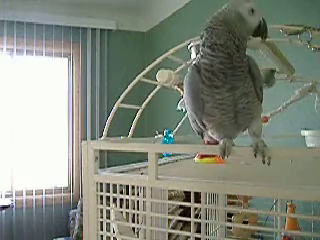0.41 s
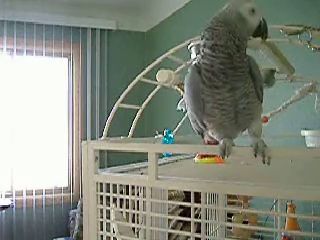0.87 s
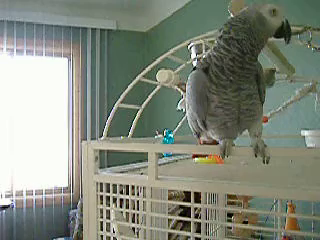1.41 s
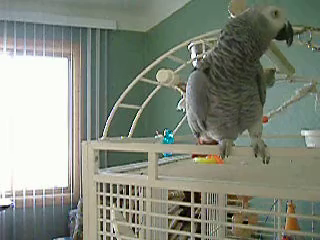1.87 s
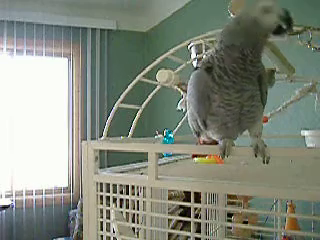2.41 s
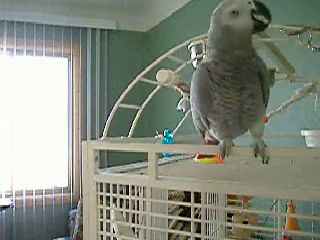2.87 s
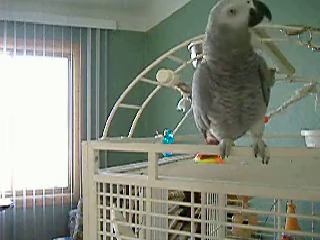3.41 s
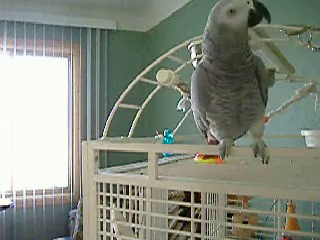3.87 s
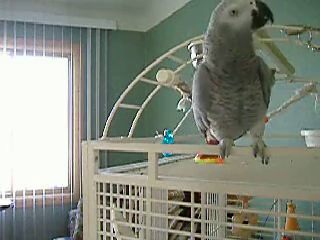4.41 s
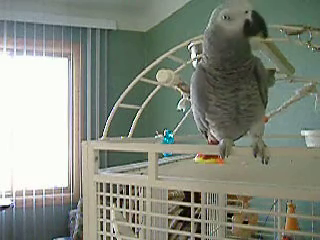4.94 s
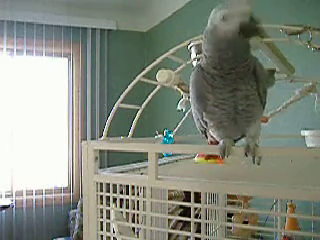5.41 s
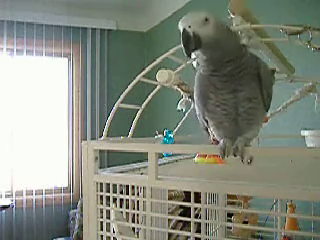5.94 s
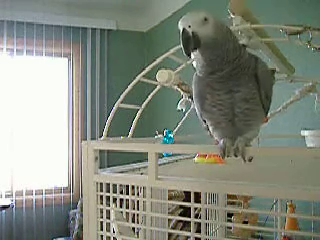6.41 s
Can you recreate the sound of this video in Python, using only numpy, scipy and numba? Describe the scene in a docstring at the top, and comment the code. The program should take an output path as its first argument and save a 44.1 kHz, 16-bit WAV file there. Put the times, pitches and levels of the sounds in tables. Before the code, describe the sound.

A small, reflective room holds a low wavering hum, dull air noise and a very thin high whine, heard through a cheap camera microphone. Soft cage knocks tick at 0.4, 0.9 and 1.5 seconds and occasionally later. Distant whistles glide upward at 1.25 and 1.85, with short peeps near 2.3 and 2.46. At 2.65 the near parrot jumps up in broken steps into a loud, nearly pure whistle, peaking around 2.9 and swooping down by 3.15, edged with crackle. A faint far warble flutters from 3.06 to 3.3; quick rising chirps come at 3.4 and 3.7, and a high falling glide at 3.9. Another fall at 4.27 overlaps a hoarse squawk from 4.28 to 4.65, leaping in pitch then sinking into breathy rasp. Echoing rapid down-chirps run from 4.6 to 5.55, then slower up-sweeps from 5.6 to 6.5, with tiny blips near 6.4.

```python
"""A parrot on its cage whistles one loud arc and a hoarse squawk: gliding near sines, then pulses ringing throat and beak.
Glides and trills, swept tones, come from further off in the room, mostly as reflections.
Soft knocks ring the cage bars and short blips sound over filtered-noise room tone and hum.
A cheap camera hears it all: gain control, a lopsided preamp, electronic whine,
and a 16 kHz converter that now and then misreads a sample."""
import sys
import numpy as np
from scipy import signal
from scipy.fft import rfft, irfft
from scipy.io import wavfile
from scipy.ndimage import uniform_filter1d
from numba import njit

SR = 44100
rng = np.random.default_rng(int(sys.argv[2]) if len(sys.argv) > 2 else 0)


def voltage_ratio(decibels):
    """Convert decibels (scalar or array-like) to amplitude ratios, 20 dB per decade."""
    exponent = np.asarray(decibels, float) / 20
    return 10 ** exponent


def digitize_waveform(pressure):
    """Quantize a signal to 16-bit integers and store it at the path in sys.argv[1].

    Rows of a 2-D input are taken as channels; values are limited to [-1, 1].
    """
    field = np.atleast_2d(pressure).T
    bounded = np.clip(field, -1, 1)
    quanta = np.round(bounded * 32767).astype(np.int16)
    wavfile.write(sys.argv[1], SR, quanta)


N = 288855
TIME = np.arange(N) / SR


def level(x, db):
    """Scale to an rms level."""
    return x * voltage_ratio(db) / np.sqrt(np.mean(x ** 2))


@njit
def bandpass(x, hz, width):
    """State-variable band-pass whose centre moves, gain 1 at the centre."""
    y, band, low = np.empty(len(x)), 0., 0.
    for i in range(len(x)):
        g, k = np.tan(np.pi * hz[i] / SR), width / hz[i]
        v = (band + g * (x[i] - low)) / (1 + g * (g + k))
        band, low, y[i] = 2 * v - band, low + 2 * g * v, k * v
    return y


@njit
def follow(x, attack, release):
    """Peak follower: closes a fixed share of the gap at each sample, rising or falling."""
    y, envelope = np.empty(len(x)), 1e-4
    for i in range(len(x)):
        gap = abs(x[i]) - envelope
        envelope += gap * (attack if gap > 0 else release)
        y[i] = envelope
    return y


def walk(rate):
    """Random levels held 1 / rate s and slewed twice."""
    hold = int(SR / rate)
    steps = np.repeat(rng.standard_normal(N // hold + 1), hold)
    return 1.2 * uniform_filter1d(uniform_filter1d(steps, hold), hold)[:N]


def gate(start, end, edge):
    """Soft on and off, with linear edges."""
    return np.clip(np.minimum(TIME - start, end - TIME) / edge, 0, 1)


# spectrum shape of the air and machine noise: (frequency [Hz], relative density [dB per Hz])
ROOM_SHAPE = [(12, -38.5), (20, -8), (59, -8.5), (138, -5.5), (168, -10), (206, -2), (366, -16.5),
              (520, -11.5), (1320, -30.5), (2460, -35), (3160, -33), (3680, -35), (6550, -35), (7420, -30),
              (8000, -30), (10400, -71), (17600, -120)]
ROOM_DB = -38  # rms of the whole noise
# wavering hums: (centre [Hz], filter width [Hz], rms level [dB])
HUMS = [(56.26, 7.1, -44), (199.4, 6.7, -45.5), (519.6, 14, -62)]


def room_tone():
    """Steady air and machine noise, with narrow bands of noise as wavering hums."""
    f = np.fft.rfftfreq(N, 1 / SR) + 1
    hz, db = np.transpose(ROOM_SHAPE)
    shape = voltage_ratio(np.interp(np.log(f), np.log(hz), db))
    out = level(irfft(rfft(rng.standard_normal(N)) * shape, N), ROOM_DB)
    for hz, width, db in HUMS:
        out += level(bandpass(rng.standard_normal(N), hz * np.ones(N), float(width)), db)
    return out


# short blips: (time [s], length [s], frequency [Hz], peak level [dB])
BLIPS = [(2.45, .004, 3392, -25), (2.662, 0.046, 516, -34), (2.667, 0.017, 7430, -25),
         (6.392, 0.015, 1487, -42), (6.437, 0.0085, 1473, -39.5)]


def blips():
    """Brief soft sine tones that swell and fade in a triangle."""
    out = np.zeros(N)
    for start, length, hz, db in BLIPS:
        out += voltage_ratio(db) * gate(start, start + length, length / 2) * np.sin(2 * np.pi * hz * TIME)
    return out


# soft knocks on the cage: (time [s], blow level [dB])
KNOCKS = [(.42, -42), (.885, -45.5), (1.5, -42.5), (2.45, -51), (2.505, -40.5), (2.565, -44.5),
          (3.63, -43.5), (4.1, -44), (4.235, -43), (5.77, -44)]
# modes of the cage bars: (frequency [Hz], relative level [dB], 60 dB decay time [s])
CAGE_BARS = [(1800, -3, .008), (2250, 0, .008), (3000, -6, .006), (3700, -2, .008)]


def cage_knocks():
    """Decaying noise bursts strike the cage bars, whose damped modes ring."""
    blows, size = np.zeros(N), 900
    for s, db in KNOCKS:
        start = int(s * SR)
        blows[start:start + size] += voltage_ratio(db) * rng.standard_normal(size) * np.exp(-np.arange(size) / 400)
    t = TIME[:SR // 8]
    ring = sum(voltage_ratio(db) * np.sin(2 * np.pi * hz * t) * np.exp(-np.log(1000) * t / t60)
               for hz, db, t60 in CAGE_BARS)
    ring /= np.sqrt(np.sum(ring ** 2))
    return signal.fftconvolve(blows, ring)[:N] + 0.23 * blows


def whistles(notes, edge, flutter_db, overtones_db, top_hz, waver):
    """The syrinx sings near sines; the beak lets overtones out only below top_hz."""
    out, shake = np.zeros(N), 1 + waver * walk(200)
    for note in notes:
        s, hz, db = np.transpose(note)
        on = slice(int(s[0] * SR), int(s[-1] * SR))
        hz, db = (uniform_filter1d(np.interp(TIME[on], s, curve), size=300) for curve in (hz, db))
        phase = 2 * np.pi * np.cumsum(hz * shake[on]) / SR
        tone = np.sin(phase)
        for multiple, over_db in overtones_db:
            tone += voltage_ratio(over_db) * np.sin(multiple * phase) / (1 + (multiple * hz / top_hz) ** 40)
        out[on] += np.sqrt(2) * voltage_ratio(db) * tone * gate(s[0], s[-1], edge)[on]
    return out * voltage_ratio(flutter_db * walk(150))


def sweeps(rows, rule):
    """Turn sweep rows into (s, Hz, dB) curves by their shared rule.

    Delay over 1 lingers on the first pitch, slowing over 1 eases into the last;
    a turning place past 1 leaves the swell still rising near the end.
    """
    delay, slowing, place, start_db, end_db = rule
    u = np.linspace(0, 1, num=24)
    way = 1 - (1 - u ** delay) ** slowing
    swell_db = np.interp(u, [0, place, 1], [start_db, 0, end_db])
    return [np.transpose([s + length * u, first_hz + (last_hz - first_hz) * way, db + swell_db])
            for s, length, first_hz, last_hz, db in rows]


def trill(notes, rule, flutter_db, waver):
    """Fast, unsteady sweeps (s, first Hz, last Hz, accent Hz, dB), slowing to their end, swelling at the accent."""
    length, slowing, width_hz, rest_db = rule
    u = np.linspace(0, 1, int(length * SR))
    fade = np.clip(np.minimum(u / 0.04, (1 - u) / 0.12), 0, 1)
    out, shake = np.zeros(N), 1 + waver * walk(250)
    for s, first_hz, last_hz, accent_hz, db in notes:
        on = slice(int(s * SR), int(s * SR) + len(u))
        hz = last_hz + (first_hz - last_hz) * (1 - u) ** slowing
        swell = voltage_ratio(rest_db) + np.exp(-((hz - accent_hz) / width_hz) ** 2)
        phase = 2 * np.pi * np.cumsum(hz * shake[on]) / SR
        out[on] += np.sqrt(2) * voltage_ratio(db) * swell * fade * np.sin(phase)
    return out * voltage_ratio(flutter_db * walk(140))


# far glides: (time [s], length [s], first pitch [Hz], last pitch [Hz], reference level before the mix [dB])
# and their rules: (delay [exponent], slowing [exponent], turning place of the swell [share of length],
# start level [dB re reference], end level [dB re reference])
SLOW_RISES = [(1.245, .35, 1572, 3218, -42.5), (1.843, .37, 1527, 3210, -40)]
SLOW_RISE_RULE = (1.12, 3.5, 0.43, -3.5, -15)
PEEPS = [(2.293, 0.13, 3364, 3600, -38.5), (2.46, .13, 3250, 3540, -42)]
PEEP_RULE = (0.75, 1.5, 0.2, 3.5, -20)
QUICK_RISES = [(3.41, .17, 3320, 4350, -25), (3.675, .18, 3110, 4220, -25.5)]
QUICK_RISE_RULE = (1.05, 2.6, .6, -22, -24)
FALLS = [(3.93, 0.28, 6720, 4154, -34.5), (4.268, .27, 6760, 4157, -33.5)]
FALL_RULE = (3, 11., 0.8, -7, -12.5)


def far_glides():
    """Gliding whistles with strong overtones."""
    glides = sweeps(SLOW_RISES, SLOW_RISE_RULE) + sweeps(PEEPS, PEEP_RULE)
    glides += sweeps(QUICK_RISES, QUICK_RISE_RULE) + sweeps(FALLS, FALL_RULE)
    return whistles(glides, 0.005, 4.1, [(2, 1.0), (3, 3.5), (4, -2.5)], 6150.0, waver=0.011)


# the warble: (time [s], first pitch [Hz], accent level before the mix [dB])
WARBLE = [(3.058, 3730, -37), (3.115, 4240, -36), (3.165, 4170, -31), (3.215, 4120, -31.5),
          (3.264, 4143, -31)]
# trill rule: (length [s], slowing [exponent], accent width [Hz], level away from the accent [dB])
WARBLE_RULE = (.05, 3.4, 220, -5)


def warble():
    """Short notes that all sweep up to one top pitch."""
    top_hz, accent_hz = 4980, 4420
    notes = [(s, hz, top_hz, accent_hz, db) for s, hz, db in WARBLE]
    return trill(notes, WARBLE_RULE, 3.0, waver=0.01)


# the falling trill: (time [s], last pitch [Hz], accent level before the mix [dB])
DOWN = [(4.6, 4575, -25), (4.692, 4500, -26), (4.799, 4064, -24), (4.895, 4145, -23.5),
        (4.987, 4100, -22.5), (5.083, 3976, -26), (5.166, 4126, -24.5), (5.256, 4194, -24.5),
        (5.335, 4080, -23.5), (5.424, 4160, -25.5), (5.508, 4177, -25)]
# its pitches at the first note: (top [Hz], accent [Hz])
DOWN_HZ = (6670, 5450)
# trill rule: (length [s], slowing [exponent], accent width [Hz], level away from the accent [dB])
DOWN_RULE = (.047, 1.2, 480, -13)


def falling_trill():
    """Downward sweeps whose top and accent sink from note to note."""
    top_sink, accent_sink = 350, 780  # Hz per s
    notes = []
    for s, last_hz, db in DOWN:
        since = s - DOWN[0][0]
        notes.append((s, DOWN_HZ[0] - top_sink * since, last_hz, DOWN_HZ[1] - accent_sink * since, db))
    return trill(notes, DOWN_RULE, 2.15, waver=0.015)


# the rising trill: (time [s], first pitch [Hz], last pitch [Hz], accent level before the mix [dB])
UP = [(5.606, 3537, 5310, -33.5), (5.735, 3435, 5390, -31), (5.867, 3367, 5500, -31.5),
      (5.994, 3420, 5595, -27.5), (6.127, 3370, 5550, -27.5), (6.258, 3244, 5630, -27),
      (6.401, 3043, 5305, -29)]
# trill rule: (length [s], slowing [exponent], accent width [Hz], level away from the accent [dB])
UP_RULE = (.1, 1.66, 451, -7)


def rising_trill():
    """Upward sweeps that swell around one accent pitch."""
    accent_hz = 4456
    notes = [(s, first_hz, last_hz, accent_hz, db) for s, first_hz, last_hz, db in UP]
    return trill(notes, UP_RULE, 3.35, waver=0.016)


# pitches the far corner favours: (centre [Hz], width [Hz], added level [dB])
CORNER = [(3600, 60, -13), (4710, 510, -6.5), (5146, 160, -9), (5500, 120, -17)]


def far_song():
    """Glides, a warble and two trills, coloured by the resonances of the far corner."""
    song = far_glides() + warble() + falling_trill() + rising_trill()
    return song + sum(voltage_ratio(db) * bandpass(song, hz * np.ones(N), float(width)) for hz, width, db in CORNER)


# squawk: (time [s], pitch [Hz], voice level [dB], beak resonance [Hz], rasp level [dB])
SQUAWK = [(4.283, 310.8, -29.5, 1400, -34), (4.295, 313, -24, 1340, -36), (4.319, 308.7, -19, 1310, -41),
          (4.327, 407, -20, 1380, -36), (4.347, 456.5, -20, 1585, -44), (4.364, 444, -22, 1450, -45),
          (4.369, 553, -18, 1405, -50), (4.395, 590, -28, 1950, -36), (4.425, 581, -28, 2030, -35.5),
          (4.457, 521.5, -23.5, 1980, -38), (4.475, 499.2, -32, 1090, -31.5), (4.506, 503, -31, 1000, -27),
          (4.531, 439, -37.5, 700, -29), (4.569, 398.4, -43, 693, -28), (4.609, 365, -45.5, 686, -32),
          (4.665, 385, -82, 700, -48)]


def squawk():
    """Pulses that jump between registers ring throat and beak; a breathy rasp climbs above and outlasts them."""
    s, *columns = np.transpose(SQUAWK)
    hz, voice_db, mouth_hz, rasp_db = (np.interp(TIME, s, column) for column in columns)
    low = hz < 350  # the low register
    # the more breath over voice, the more the pulses stumble; the low register creaks
    rough = np.clip(voltage_ratio(rasp_db - voice_db), 0.4, 5) + 0.5 * low
    cycle = np.floor(np.cumsum(hz * (1 + 0.036 * rough * walk(200))) / SR)
    pulses = np.diff(cycle, prepend=0) * voltage_ratio(4.0 * walk(300))
    # air leaks in a puff around each closure
    puffs = uniform_filter1d(pulses, size=30) * np.sqrt(30)
    pulses += 0.16 * puffs * rng.standard_normal(N)

    beak_width = 588.0  # Hz
    beak = bandpass(bandpass(pulses, mouth_hz, beak_width), mouth_hz, beak_width)
    throat_hz = hz * (1 + low)  # the low register rings it with its octave
    throat = bandpass(bandpass(pulses, throat_hz, 340.0), throat_hz, 500.0)
    # as the beak opens the throat is heard less: -20 dB per octave, even with the beak at 967 Hz
    throat_db = np.maximum(-20 * np.log2(mouth_hz / 967), -15.5) + 8 * low
    upper = bandpass(pulses, 3050.0 * np.ones(N), 1300.0)
    voice = level(beak, 0) + voltage_ratio(throat_db) * level(throat, 0) + level(upper, -17.5)

    climb_s = 4.45  # the rasp holds its pitch until here, then climbs
    rasp_hz = 2690 + 3500 * np.clip(TIME - climb_s, 0, s[-1] - climb_s)
    rasp = bandpass(bandpass(rng.standard_normal(N), rasp_hz, 900.0), rasp_hz, 1300.0)
    return gate(s[0], s[-1], 0.0036) * (voltage_ratio(voice_db) * voice + voltage_ratio(rasp_db) * level(rasp, 0))


# broken steps: (time [s], length [s], first pitch [Hz], last pitch [Hz], reference level before the mix [dB])
STEPS = [(2.655, 0.03, 2070, 2730, -26), (2.683, 0.024, 2217, 2550, -10.5),
         (2.707, 0.042, 3026, 3390, -11.5), (2.749, 0.021, 3930, 4040, -18.5)]
# sweep rule: (delay [exponent], slowing [exponent], turning place of the swell [share of length],
# start level [dB re reference], end level [dB re reference])
STEP_RULE = (1.23, 1.4, 1.7, -6.5, 5)
# the loud arc close by, a list for each note: (time [s], pitch [Hz], level before the mix [dB])
ARC = [
    [(2.768, 3510, -13), (2.79, 3534, -11), (2.815, 3662, -0.5), (2.86, 4162, -1), (2.9, 4211, -2),
     (2.95, 3970, -2), (3.0, 3486, -5), (3.032, 3196, -13)],
    [(3.036, 2858, -10), (3.08, 2430, -16.5), (3.142, 2083, -15), (3.15, 2040, -33), (3.29, 1415, -58.5)],
]


def loud_arc():
    """The voice climbs in broken steps, then whistles one nearly pure arc."""
    steps = whistles(sweeps(STEPS, STEP_RULE), 0.002, 2.9, [(1.4, -26), (2, -27)], 6000., waver=0.025)
    return steps + whistles(ARC, 0.00033, 0.32, [(1.5, -44.5), (2, -30)], 9500., waver=0.0024)


def echo(x, t60, build_s):
    """Diffuse reflections of a small hard room, as decaying noise of unit energy."""
    t = TIME[:SR // 2]
    tail = rng.standard_normal(len(t)) * np.exp(-np.log(1000) * t / t60) * np.clip(t / build_s, 0, 1)
    return signal.fftconvolve(x, tail / np.sqrt(np.sum(tail ** 2)))[:N]


def scene():
    """The near voice is mostly direct, the far song mostly reflected, the small sounds about half each."""
    arc, call, far = loud_arc(), squawk(), far_song()
    small = cage_knocks() + blips()
    to_walls = voltage_ratio(-6.0) * arc + voltage_ratio(-7.0) * call + voltage_ratio(-2.5) * far + voltage_ratio(0.5) * small
    direct = voltage_ratio(1.5) * arc + call + voltage_ratio(-5.5) * far + small
    return (direct + echo(to_walls, 0.31, 0.0042) + room_tone())[None]


ADC_HZ = 16000  # converter sample rate
# whine of the camera electronics: (frequency [Hz], rms level [dB])
WHINE = [(7221, -92.5), (7289, -61), (7357, -68.5), (7424, -88.5), (7886, -76)]


def electronics_whine(size):
    """Steady sines from the camera electronics, at the converter rate."""
    t = np.arange(size) / ADC_HZ
    return sum(voltage_ratio(db) * np.sqrt(2) * np.sin(2 * np.pi * hz * t) for hz, db in WHINE)


# the worst misread converter samples: (time [s], error [dB])
SLIPS = [(2.6916, -9), (2.705, -5), (2.7712, -12.5), (2.8135, -11.5), (2.8222, -11.5), (2.8267, -6.5),
         (2.9027, -7.5), (3.0028, -8), (3.0071, -14), (3.0169, -9.5), (3.0219, -8), (3.0605, -10.5),
         (3.0693, -1.5), (3.082, -3.5), (3.096, -12), (3.1324, -11), (4.3172, -8), (4.3409, -11.5),
         (4.3652, -14), (4.3856, -14), (4.4094, -13.5), (4.4985, -8), (4.5177, -10), (4.6363, -16.5),
         (4.923, -21), (5.0332, -12), (5.3591, -16.5), (5.5758, -16), (5.5484, -16), (5.9333, -19),
         (6.199, -14.5), (6.2119, -16)]


def misread(x):
    """Loud sound brings grit; clock stumbles read samples late; the worst errors pull against the wave."""
    size = len(x)
    # about 60 stumbles per s, each pulling three samples part of the way to the one before
    stumble = (rng.random(size) < 60 / ADC_HZ) * rng.random(size)
    late = np.convolve(stumble, np.ones(3), "same") * (np.roll(x, 1) - x)
    most = 0.16  # largest late-reading error
    y = x + most * np.tanh(late / most)
    loud = uniform_filter1d(np.abs(x), size=64)
    y += voltage_ratio(-41.0) * loud * rng.standard_normal(size)
    # smaller slips come by chance, in bunches, while the sound is over -30 dB
    bunch = voltage_ratio(7 * walk(11)[:size])
    slips_per_s = 36  # average chance before the loudness condition
    slips = (rng.random(size) < slips_per_s / ADC_HZ * bunch / np.mean(bunch)) * (loud > voltage_ratio(-30))
    slip_db = 5.5 + 3.5 * rng.standard_normal(size)  # over the local level, which is capped
    y -= slips * np.sign(x) * np.minimum(loud, voltage_ratio(-29.5)) * voltage_ratio(slip_db)
    s, db = np.transpose(SLIPS)
    at = np.rint(s * ADC_HZ).astype(int)
    y[at] -= np.sign(x[at]) * voltage_ratio(db)
    return np.clip(y, -0.4, 0.4)


def roll_off(x):
    """The treble ends steeply here."""
    return signal.sosfilt(signal.butter(12, 9200, fs=SR, output="sos"), x)


def record(dry):
    """Gain control, overload, 16 kHz sampling, a square-law preamp whose octave folds back, misread samples."""
    top_db, ratio = -13.5, 4.4  # gain control threshold and compression ratio
    loud = follow(dry[0], 1 / (0.0022 * SR), 1 / (0.036 * SR))  # 2.2 ms attack, 36 ms release
    x = dry[0] * np.minimum(voltage_ratio(top_db) / loud, 1) ** (1 - 1 / ratio)
    x = np.clip(x, -0.36, 0.36)
    x = signal.resample_poly(x, 160, 441)  # to ADC_HZ
    lopsided, offset = 0.22, -0.0029  # square-law share and constant shift
    x = x + lopsided * x ** 2 + offset + electronics_whine(len(x))
    mix = signal.resample_poly(misread(x), 441, 160)[:N]  # back to SR
    return roll_off(mix[None])


dry = scene()
out = record(dry)
digitize_waveform(out)
```